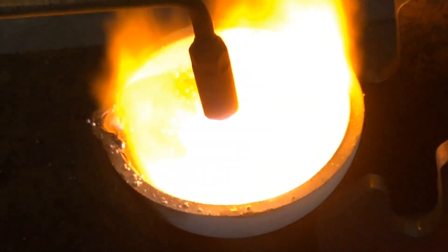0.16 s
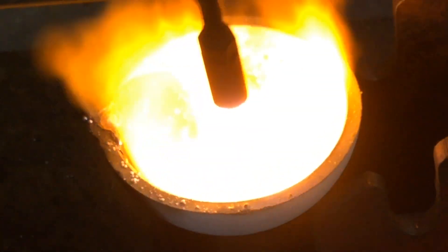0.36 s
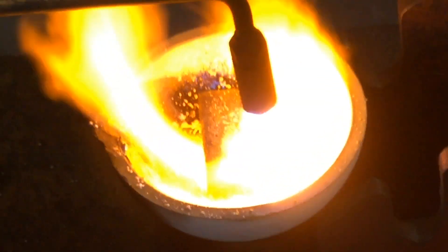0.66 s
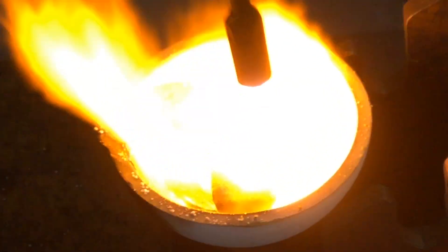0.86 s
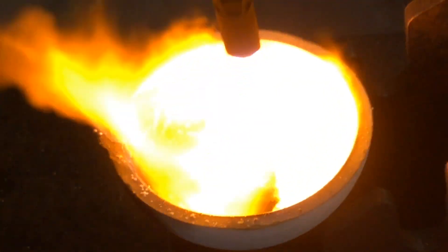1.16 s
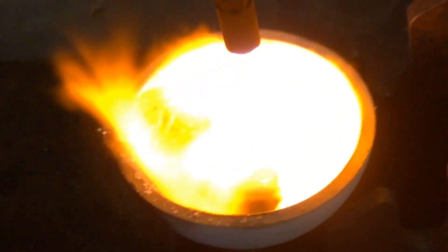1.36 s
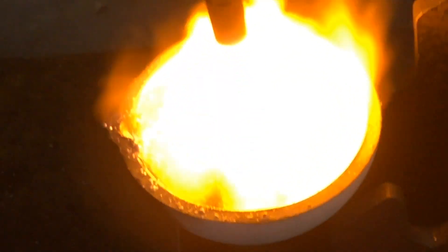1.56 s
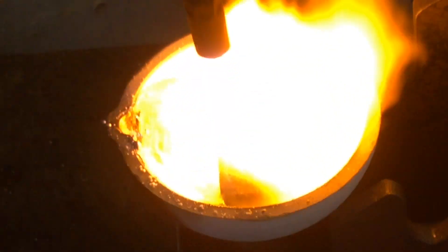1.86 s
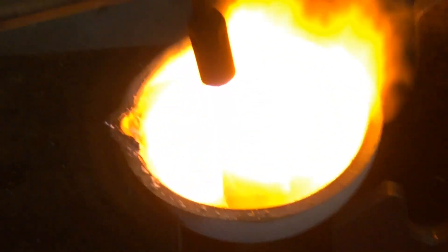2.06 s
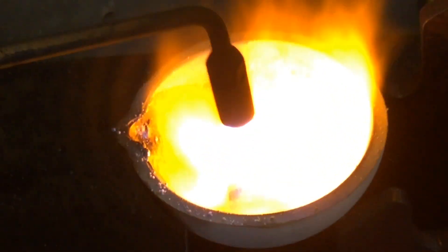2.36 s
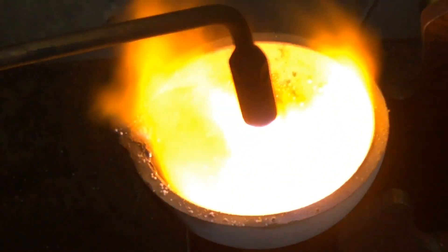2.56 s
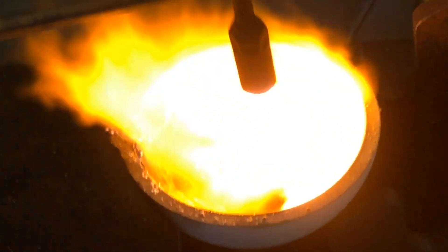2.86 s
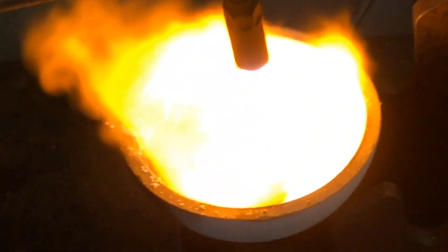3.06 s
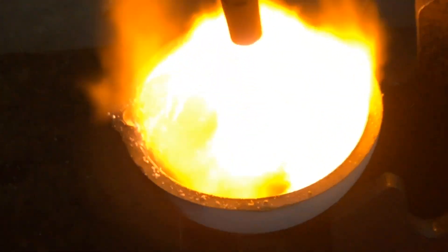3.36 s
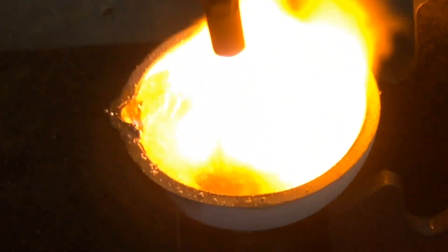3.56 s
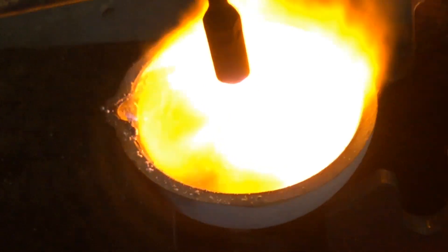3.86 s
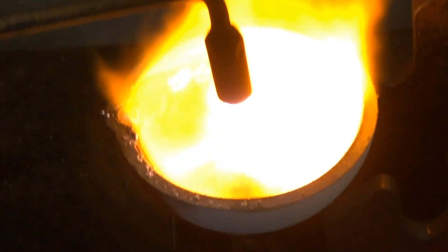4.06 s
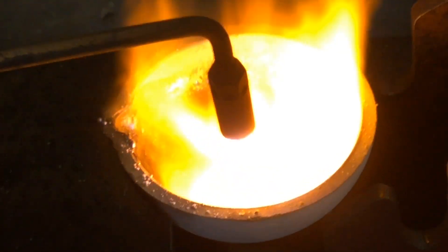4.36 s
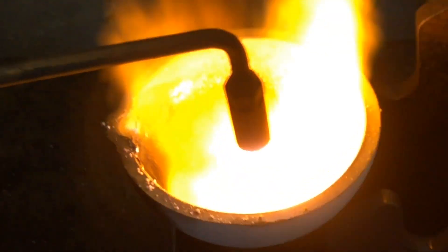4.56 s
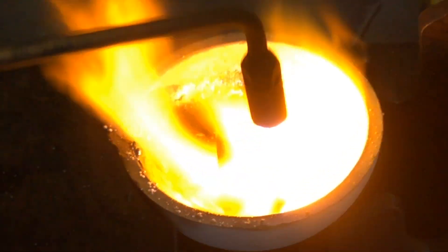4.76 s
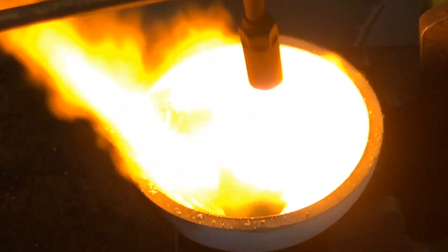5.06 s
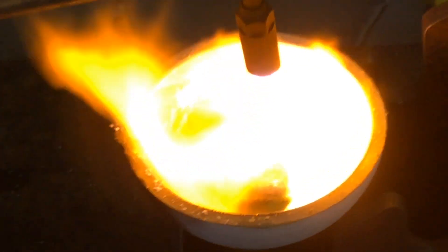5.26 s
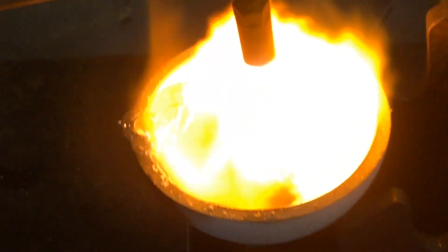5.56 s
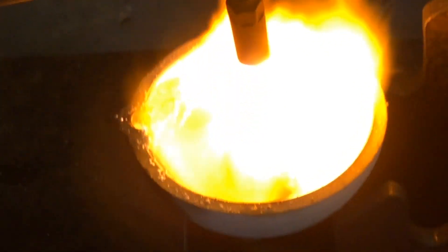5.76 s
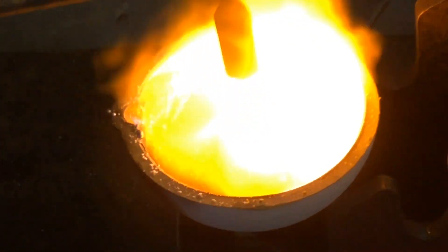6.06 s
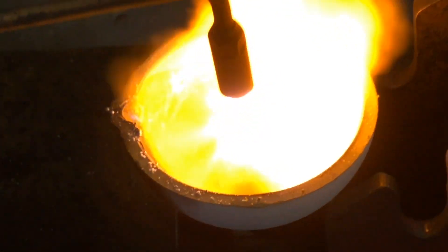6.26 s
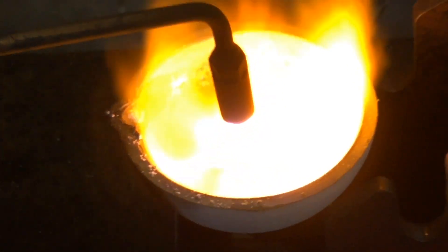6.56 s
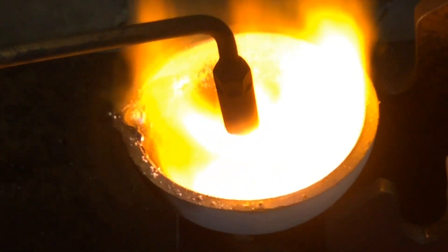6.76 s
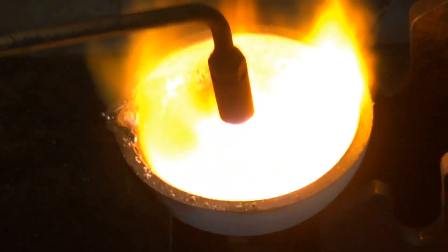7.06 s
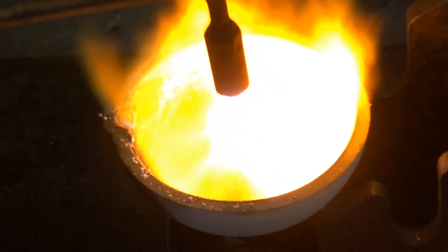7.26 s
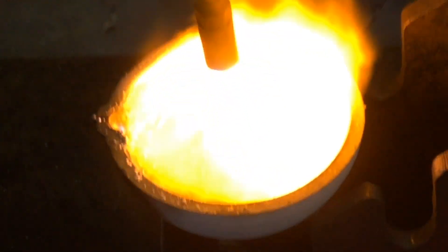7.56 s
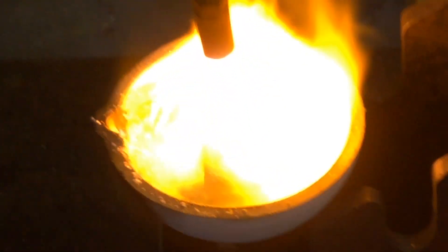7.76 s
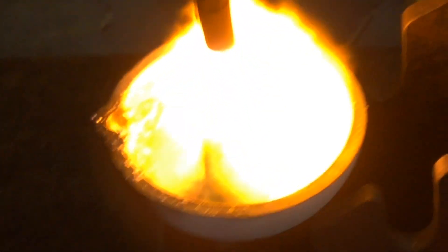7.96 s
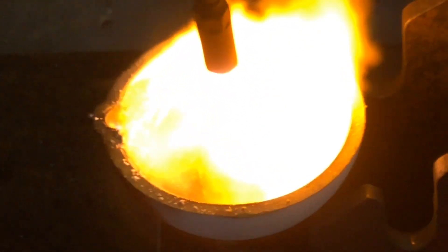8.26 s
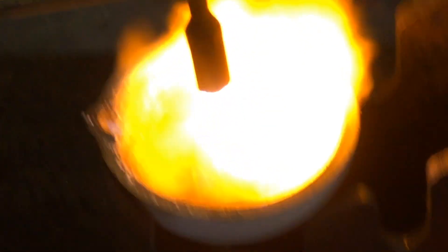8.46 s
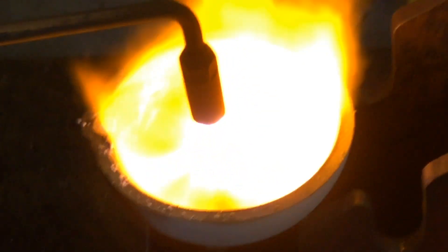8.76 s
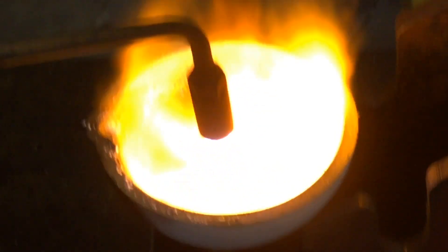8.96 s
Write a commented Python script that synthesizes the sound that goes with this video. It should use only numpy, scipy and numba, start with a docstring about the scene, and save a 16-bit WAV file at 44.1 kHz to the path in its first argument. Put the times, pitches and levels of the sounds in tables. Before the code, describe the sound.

Close, steady gas torch hiss swells each time it dips into a crucible, with fluttering gusts, puffs and a low flame drone between.

```python
"""A gas torch is swept round a crucible of melt on a workshop bench, close to a mono microphone.
The flame roars steadily and drones when it burns free; each time the nozzle dips into the bowl the
jet hisses louder and rings the hollow, and the deflected blast rushes over the microphone in ragged
surges and single puffs. The melt spits now and then."""
import sys
import numpy as np
from scipy import signal
from scipy.fft import rfft, irfft, next_fast_len
from scipy.io import wavfile
from scipy.ndimage import uniform_filter1d
from numba import njit

SR = 44100
rng = np.random.default_rng(int(sys.argv[2]) if len(sys.argv) > 2 else 0)


def transcribe(u):
    """Save the signal u as a 16-bit wav file named by the first command-line argument.

    u: samples, shape (n,) or (channels, n), limited to [-1, 1]; the rate is SR.
    q: integer samples, one column per channel.
    """
    v = np.clip(np.atleast_2d(u).T, -1, 1)
    q = np.round(v * 32767).astype(np.int16)
    wavfile.write(sys.argv[1], SR, q)


N = 402633
TIME = np.arange(N) / SR
TOP_HZ = 15250
DIP_RAMP_S = 0.034  # the hand lowers or lifts the nozzle this quickly
# dips into the bowl: (in [s], out [s], hiss [dB], hollow [dB], rim [dB], rim pitch [Hz])
DIPS = [(-0.3, 1.033, -20.5, -25, -23, 9060), (2.213, 3.048, -20.5, -23.5, -23, 8500),
        (4.104, 5.07, -22, -26.5, -25, 9460), (6.34, 7.406, -19, -21, -33, 10600),
        (8.73, 9.5, -20, -23, -25, 10400)]


def torch(lifted_notch_hz=3150, dipped_notch_hz=4350, lip_pass_s=0.16):
    """Jet and flame; reflections off bench and bowl cancel them in notches that waver with the hand."""
    sound = scatter(jet(), nearest_s=0.000156, spread=3.5, share=0.28, drift_rate=4, sway=0.099, count=3)
    sound = sound + flame()
    # the lip shades part of the hiss just before and after each dip
    at_lip = sum(bell(start - 0.17, lip_pass_s) + bell(end + 0.12, lip_pass_s) for start, end, *_ in DIPS)
    sound = sound - 0.4 * at_lip * ring(sound, hz=5750, width_hz=2800)
    inside = depth(ramp_s=0.17)
    notch_hz = (lifted_notch_hz + (dipped_notch_hz - lifted_notch_hz) * inside) * (1 + .035 * walk(7))
    notch_depth = np.clip(0.53 + .22 * walk(5), 0, .85)
    sound = sound - 0.36 * inside * ring(sound, 1.906 * notch_hz, width_hz=480)  # upper notch, bowl only
    return sound - notch_depth * ring(sound, notch_hz, width_hz=720)


def jet(rim_width_hz=2600, flutter_db=1.4):
    """Nozzle hiss; the hollow and the rim of the bowl ring with it as the torch dips in."""
    # tone of the hiss: (frequency [Hz], level [dB])
    hiss_spectrum = [(1000, -12), (2700, -0.5), (3400, -26), (4400, -22), (5200, -5.5), (7000, 0),
                     (9000, 5), (12000, 5.5), (15000, 1.5)]
    # resonances of the crucible's hollow: (frequency [Hz], half-width of each filter [Hz], level [dB])
    hollow_modes = [(4960, 340, 1.5), (5690, 810, 3.5), (6860, 770, 3)]
    hiss_db, hollow_db, rim_db, rim_hz = jet_controls()
    hiss = colour(noise(), hiss_spectrum) * undb(hiss_db + flutter_db * walk(110))
    hollow = unit(sum(undb(db) * noise_band(hz, 2 * half_width) for hz, half_width, db in hollow_modes))
    hollow *= undb(hollow_db + flutter_db * walk(110))
    rim = unit(noise_band(rim_hz, rim_width_hz)) * undb(rim_db + flutter_db * walk(110))
    return scatter(hiss + hollow + rim, nearest_s=.0007, spread=9, share=.29, drift_rate=2.5, sway=.015)


def jet_controls(lifted_hiss_db=-26.5, lifted_ring_db=-36, lifted_rim_hz=7200,
                 approach_db=3.5, approach_s=0.43, glide_s=0.065):
    """Hiss, hollow and rim levels in dB and the rim's pitch: all rise as the nozzle dips."""
    hiss, hollow, rim, rim_hz = lifted_hiss_db, lifted_ring_db, lifted_ring_db, lifted_rim_hz
    for start, end, hiss_db, hollow_db, rim_db, hz in DIPS:
        inside = spell(start, end, DIP_RAMP_S)
        nearing = approach_db * np.exp(-np.abs(TIME - start) / approach_s) * (1 - inside) * (TIME < end)
        hiss = hiss + inside * (hiss_db - lifted_hiss_db) + nearing
        rim = rim + inside * (rim_db - lifted_ring_db) + 2 * nearing
        well_inside = spell(start + 0.1, end - 0.065, 2 * DIP_RAMP_S)  # here the hollow rings louder
        hollow = hollow + well_inside * (hollow_db - lifted_ring_db)
        rim_hz = rim_hz + spell(start - approach_s, end - 2 * glide_s, glide_s) * (hz - lifted_rim_hz)
    hiss_swell, hollow_swell, rim_swell = swells()
    return hiss + hiss_swell, hollow + hollow_swell, rim + rim_swell, rim_hz


def swells():
    """Gain rides in dB for hiss, hollow and rim as the swept jet meets the melt and the wall."""
    # passes of the jet: (middle [s], length [s], hiss gain [dB], hollow gain [dB], rim gain [dB])
    passes = [(0.06, 0.16, 4, 6.5, 1), (0.348, 0.15, 2.5, 0.5, 2), (0.618, 0.32, 4.5, -0.5, 8.5),
              (0.76, 0.15, -1, 10, 0.5), (0.9, 0.071, 3.5, 5.5, 4), (1.198, .09, 4, 4, 8),
              (1.397, 0.19, 4.5, 5, 7), (1.944, .27, 4, 8, 2), (2.27, 0.11, 7.5, 12.5, 3),
              (2.424, 0.1, 7, 7, -4), (2.636, 0.21, 3.5, 0, 4), (2.84, 0.1, 6.5, 2, 6.5),
              (3.356, 0.15, 4, 0, -3), (3.734, 0.42, 4.5, 3, -1), (4.218, 0.23, 8.5, 4, 4),
              (4.824, 0.22, 10, 2.5, 8), (5.333, .22, 6.5, 5, -4), (5.743, 0.25, 1.5, 3.5, -18),
              (6.548, 0.45, 5, -10.5, 4), (6.85, 0.19, 2.5, 1, 5), (7.203, 0.21, 5, -4, 14.5),
              (7.81, .16, 8.5, 11, -13), (8.24, 0.12, 6.5, 8.5, -5), (8.847, 0.43, 6.5, -4, -2)]
    return sum(np.outer(gains_db, bell(middle, length)) for middle, length, *gains_db in passes)


def depth(ramp_s):
    """How far the nozzle is in the bowl, from 0 (lifted) to 1 (dipped)."""
    return sum(spell(start, end, ramp_s) for start, end, *_ in DIPS)


def flame(diffuse_db=-2, flicker_db=1.63, lick_db=2.5):
    """Turbulent burning: a low drone and a flickering roar coloured by bowl and bench."""
    # tone of the roar: (frequency [Hz], level [dB])
    roar_spectrum = [(450, -13), (570, -10.5), (680, 2), (950, 1.5), (1250, -4.5), (2000, -2.5), (3200, -1),
                     (4000, 0.5), (5200, -11), (8000, -81.5)]
    # resonances of bowl and bench: (frequency [Hz], width [Hz], level [dB])
    bench_modes = [(660, 290, -7), (853, 145, -18), (1217, 53, -4.5), (1430, 82, 3), (1654, 70, 1.5),
                   (1806, 96, 5.5), (2053, 72, -2), (2477, 32, -1), (2870, 80, -4), (3600, 43, -34),
                   (4400, 94, -8)]
    # tone of the drone: (frequency [Hz], level [dB])
    drone_spectrum = [(25, -33), (60, -16), (120, -9), (205, 0), (260, -1.5), (330, -11), (400, -8),
                      (520, -23.5), (900, -51)]
    roar_db, drone_db = flame_controls()
    roar = colour(noise(), roar_spectrum)
    roar = undb(diffuse_db) * roar + sum(undb(db) * ring(roar, hz, width) for hz, width, db in bench_modes)
    roar = unit(scatter(roar, nearest_s=.003, spread=5, share=.19, drift_rate=2, sway=.01))
    roar *= undb(roar_db + flicker_db * walk(120))
    drone = colour(noise(), drone_spectrum) * undb(drone_db + lick_db * walk(25))
    return roar + drone


def flame_controls(lifted_roar_db=-29, dip_db=-0.5, entry_db=1, smothered_db=-39, settle_s=0.054):
    """Levels in dB: the roar swells with the jet; the drone builds as the flame burns above the bowl."""
    # spells of free burning: (start [s], end [s], drone level [dB])
    free_burns = [(1.287, 2.202, -30.5), (3.088, 4.1, -32), (5.24, 6.26, -33), (7.868, 8.75, -31)]
    roar = lifted_roar_db + dip_db * depth(DIP_RAMP_S) + 0.63 * swells()[0]
    roar += entry_db * sum(bell(start, 0.17) for start, *_ in DIPS)  # harder on meeting the melt
    drone_rise = sum(spell(start, end, settle_s) * (db - smothered_db) for start, end, db in free_burns)
    return roar, smothered_db + drone_rise


def surges(buffet_db=2, ragged_db=2.5, chop=0.44, calm_db=-31):
    """The blast sweeps over the microphone: eddies rumble, and the fast ones tear into brighter noise."""
    # tone of the rumble: (frequency [Hz], level [dB])
    rumble_spectrum = [(20, -30), (35, -4), (70, 5.5), (165, 2.5), (290, -4), (450, -9.5), (900, -27)]
    rumble_db, tear_db = gust_levels()
    eddies = walk(140)
    shedding_hz = np.maximum(210 * undb((tear_db + 15) / 2), 90)  # a faster stream sheds at a higher pitch
    shedding = unit(ring(noise(), shedding_hz, width_hz=130))
    rumble = unit(colour(noise(), rumble_spectrum) + .5 * shedding)
    # the tearing comes in shreds that ride on the pressure swings
    tear = unit(tearing() * undb(ragged_db * eddies) * (1 + chop * rumble))
    rumble = unit(rumble * undb(buffet_db * eddies))
    torn = 1 / (1 + undb(2 * (calm_db - tear_db)))  # a slow stream hardly tears
    return rumble * undb(rumble_db) + torn * tear * undb(tear_db)


def gust_levels(draught_db=-37, still_db=-58, attack_s=0.0097, release_s=0.02,
                rumble_sag_db_s=12, tear_sag_db_s=59.5):
    """Rumble and tearing in dB over a faint draught; a gust slows, so its tearing fades first."""
    # gusts of deflected gas: (start [s], length [s], rumble level [dB], tearing level [dB])
    gusts = [(0.054, 0.041, -19, -19), (0.092, 0.038, -24, -26), (0.604, 0.032, -26, -26),
             (0.721, 0.043, -18, -23), (0.755, 0.066, -14, -14), (0.857, .07, -15.5, -19),
             (0.955, 0.04, -25, -27), (2.244, 0.075, -22.5, -21.5), (2.357, .11, -16, -19.5),
             (2.59, 0.017, -26, -30), (2.766, 0.074, -24.5, -26), (2.831, 0.062, -6, -10),
             (2.918, 0.092, -22, -25.5), (4.128, .045, -20, -18), (4.167, .05, -10, -7.5),
             (4.21, .15, -14, -15), (4.373, 0.078, -17.5, -19.5), (4.487, 0.1, -24, -31),
             (4.721, 0.18, -19.5, -23), (4.868, 0.079, -13, -7), (4.98, 0.055, -16, -19),
             (5.088, 0.026, -25, -26), (6.396, .06, -27, -23.5), (6.465, .13, -11, -12),
             (6.58, 0.1, -11.5, -9.5), (6.714, .15, -13.5, -13), (6.92, 0.1, -17, -16.5),
             (7.114, 0.036, -17, -23), (7.209, 0.14, -14, -6.5), (7.332, 0.074, -16.5, -18),
             (7.451, 0.012, -26, -20.5), (8.789, 0.098, -26, -26), (8.874, .125, -13, -7.5),
             (8.99, .15, -13.5, -14)]
    rumble = tear = undb(still_db) + undb(draught_db) * depth(DIP_RAMP_S)
    for start, length, rumble_db, tear_db in gusts:
        age = np.maximum(TIME - start, 0)
        envelope = np.minimum(age / attack_s, 1) * np.exp(-np.clip((age - length) / release_s, 0, 20))
        rumble = np.maximum(rumble, envelope * undb(rumble_db - rumble_sag_db_s * age))
        tear = np.maximum(tear, envelope * undb(tear_db - tear_sag_db_s * age))
    return 20 * np.log10(rumble), 20 * np.log10(tear)


def puffs(thump_db=-2, crack_db=-4, push_s=0.0057, crack_s=0.0029,
          first_hz=400, last_hz=68, slowing_s=0.00258):
    """A lone eddy gives a short crack and a swing of pressure that slows as the eddy spreads."""
    # eddies that hit the microphone: (time [s], relative level [dB], crack offset [dB])
    hits = [(0.064, -8.5, -1), (0.294, -14, -8), (0.322, -12.5, -10), (0.38, -8, -2.5), (0.424, -14, -10),
            (0.47, -13, 1), (0.616, -9, 0), (0.874, -5, -6), (1.188, -10, -6), (2.298, -10, -6),
            (2.451, -1, -12), (2.595, -6.5, -6.5), (2.679, -13.5, -1.5), (3.005, -6, -30),
            (4.178, -0.5, -4.5), (4.392, -8.5, 3.5), (4.565, -7, -24), (4.723, -11, -6), (4.753, -13, -1),
            (5.041, -5, -6.5), (6.375, -16, -10), (6.465, -11, 2), (6.878, -16, 2), (7.408, -6, -2.5),
            (7.465, -11, -21), (7.62, -19.5, -3)]
    speeds = np.exp(0.19 * rng.standard_normal(len(hits)))
    age = np.arange(int(12 * push_s * SR)) / SR
    thump = np.zeros(N)
    for (start, db, _), speed in zip(hits, speeds):
        hz = speed * (last_hz + (first_hz - last_hz) * np.exp(-age / slowing_s))
        swing = np.sin(2 * np.pi * np.cumsum(hz) / SR) * (1 + age / push_s) * np.exp(-age / push_s)
        thump[int(start * SR):][:len(age)] -= undb(db) * swing
    cracks = sum(undb(db + offset_db) * burst(start, crack_s) for start, db, offset_db in hits)
    return undb(thump_db) * thump + undb(crack_db) * cracks * tearing()


def tearing():
    """The rasp of fast gas on the microphone; rms 1."""
    # tone of the rasp: (frequency [Hz], level [dB])
    tear_spectrum = [(120, -13), (300, -4), (450, -2.5), (620, -1.5), (950, -7.5), (1500, -9), (2500, -15),
                     (4500, -22), (9000, -81)]
    return colour(noise(), tear_spectrum)


def spits(spit_db=-6, rise_s=0.00097):
    """Tiny bursts at the surface of the melt."""
    # spits of the melt: (time [s], relative level [dB])
    pops = [(0.132, -11), (0.195, -11), (1.901, -10), (2.272, -5.5)]
    bursts = sum(undb(db) * burst(start, rise_s) for start, db in pops)
    return undb(spit_db) * bursts * unit(noise_band(hz=1450, width_hz=1700))


def scatter(x, nearest_s, spread, share, drift_rate, sway, count=8):
    """Add echoes from bowl, tongs and bench; each fades and shifts as the torch turns."""
    lags = nearest_s * spread ** ((np.arange(count) + rng.random(count)) / count)
    echoes = 0
    for lag in lags:
        path = np.arange(N) - SR * lag * (1 + sway * walk(1.5))
        strength = np.tanh(walk(drift_rate * rng.uniform(0.502, 2)))
        echoes = echoes + strength * np.interp(path, np.arange(N), x)
    return (x + share * echoes) / np.sqrt(1 + share ** 2 * count / 2)


def undb(db):
    """Decibels to gain."""
    return np.exp(np.asarray(db) * (np.log(10) / 20))


def unit(x):
    """Scale to rms 1."""
    return x / np.sqrt(np.mean(x ** 2))


def noise():
    """White noise."""
    return rng.standard_normal(N)


def noise_band(hz, width_hz):
    """White noise through the same resonance twice, for steeper skirts."""
    return ring(ring(noise(), hz, width_hz), hz, width_hz)


def colour(x, points):
    """Equalise by a curve of (frequency [Hz], level [dB]) points; rms 1."""
    hz, db = np.transpose(points)
    size = next_fast_len(N)
    bins = np.maximum(np.fft.rfftfreq(size, 1 / SR), 1)
    gain = undb(np.interp(np.log(bins), np.log(hz), db))
    return unit(irfft(rfft(x, size) * gain, size)[:N])


def walk(rate):
    """Glide between random levels, rate of them a second; rms 1."""
    hold = max(int(SR / rate), 2)
    steps = np.repeat(rng.standard_normal(N // hold + 1), hold)
    return unit(uniform_filter1d(steps, hold)[:N])


@njit
def svf(x, hz, width):
    """State-variable band-pass with a moving centre, gain 1 there."""
    y, band_state, low_state = np.empty(len(x)), 0., 0.
    for i in range(len(x)):
        tuning, damping = np.tan(np.pi * hz[i] / SR), width / hz[i]
        band = (band_state + tuning * (x[i] - low_state)) / (1 + tuning * (tuning + damping))
        band_state = 2 * band - band_state
        low_state += 2 * tuning * band
        y[i] = damping * band
    return y


def ring(x, hz, width_hz):
    """One resonance, still or moving."""
    return svf(x, np.minimum(hz, TOP_HZ) * np.ones(N), float(width_hz))


def burst(start, rise_s):
    """A pulse of height 1 that swells for rise_s and dies away."""
    age = np.clip((TIME - start) / rise_s, 0, 20)
    return age * np.exp(1 - age)


def spell(start, end, ramp_s):
    """A smooth rise from 0 to 1 at start and back at end."""
    return (1 + np.tanh((TIME - start) / ramp_s)) * (1 + np.tanh((end - TIME) / ramp_s)) / 4


def bell(middle, length):
    """A smooth bump of height 1, length s wide at half height."""
    return np.exp(-np.minimum(np.log(2) * (2 * (TIME - middle) / length) ** 2, 20))


def scene():
    """Torch, blast and spits reach one microphone, the same on both channels."""
    blast = np.tanh(surges() + puffs())  # the widest pressure swings flatten
    return np.tile(torch() + blast + spits(), (2, 1))


def record(dry):
    """The microphone loses the deepest bass and rounds the highest peaks; the top is cut."""
    dry = signal.sosfilt(signal.butter(3, 36, "high", fs=SR, output="sos"), dry)
    rounded = dry / (1 + dry ** 8) ** (1 / 8)
    return signal.sosfilt(signal.ellip(12, .1, 80, TOP_HZ, fs=SR, output="sos"), rounded)


dry = scene()
out = record(dry)
transcribe(out)
```